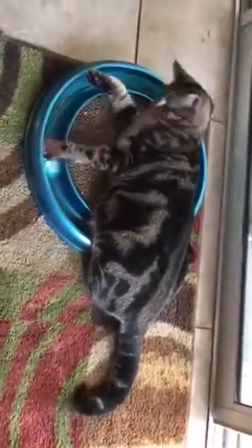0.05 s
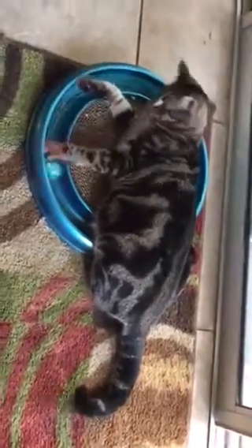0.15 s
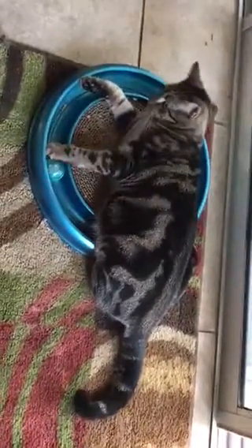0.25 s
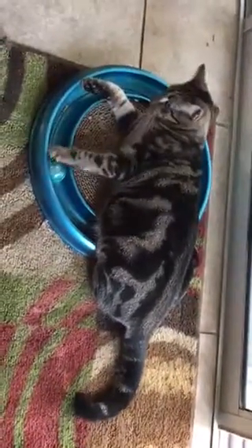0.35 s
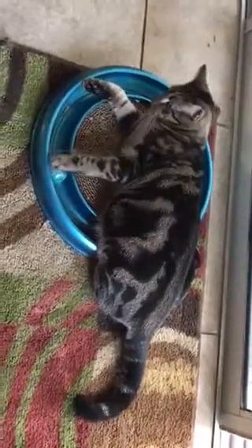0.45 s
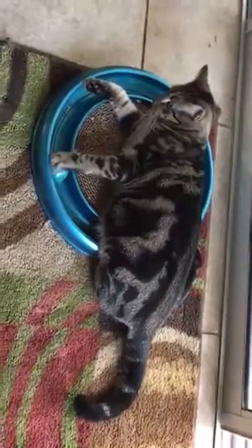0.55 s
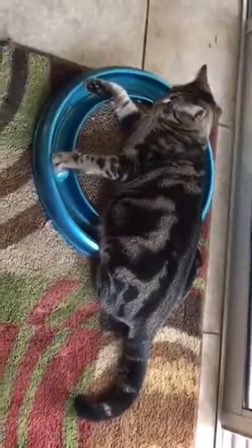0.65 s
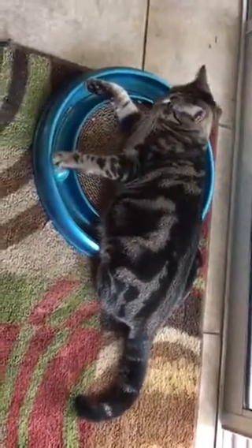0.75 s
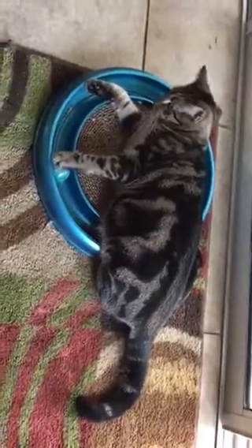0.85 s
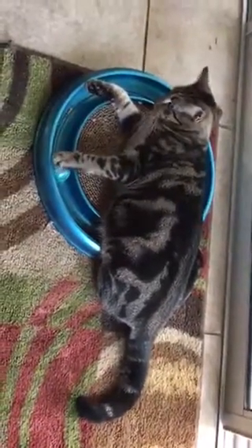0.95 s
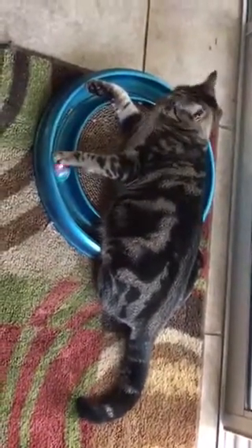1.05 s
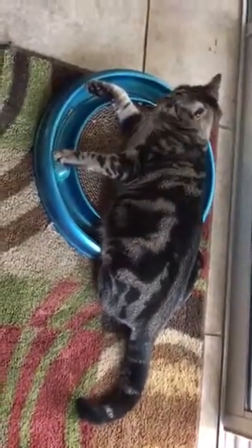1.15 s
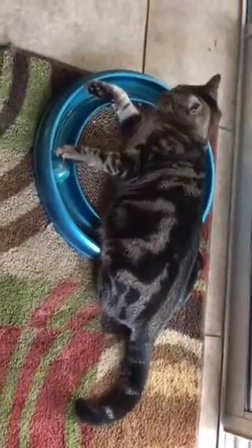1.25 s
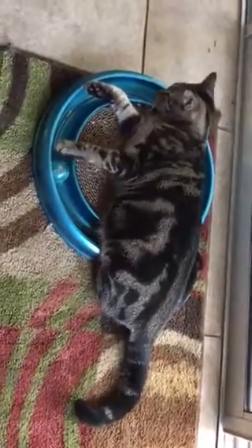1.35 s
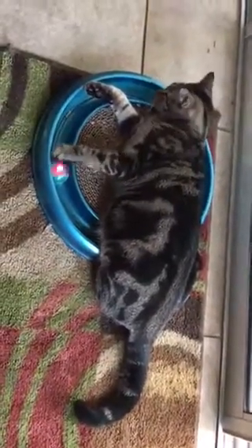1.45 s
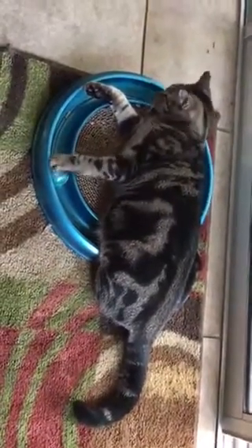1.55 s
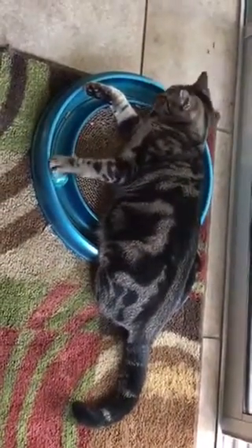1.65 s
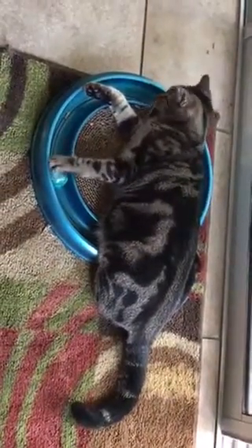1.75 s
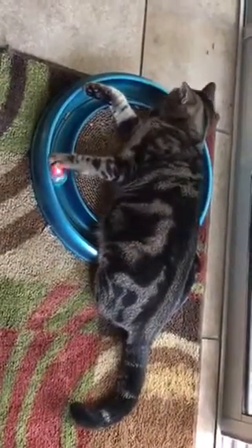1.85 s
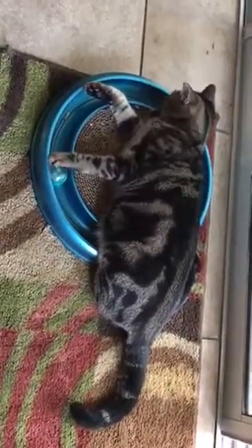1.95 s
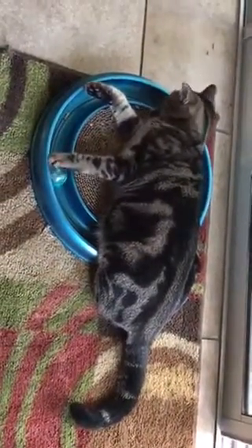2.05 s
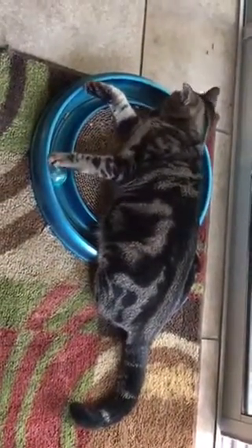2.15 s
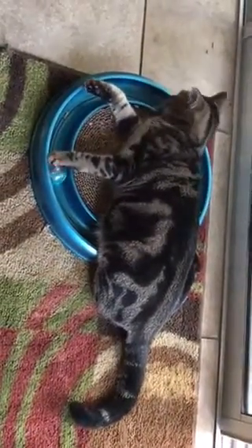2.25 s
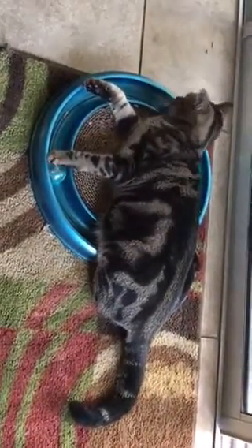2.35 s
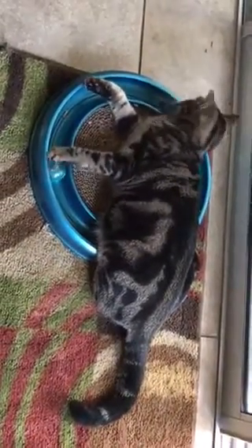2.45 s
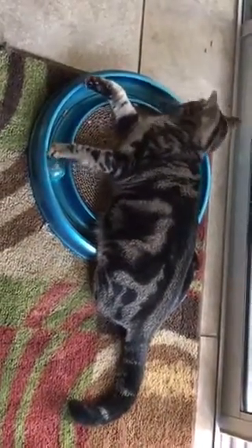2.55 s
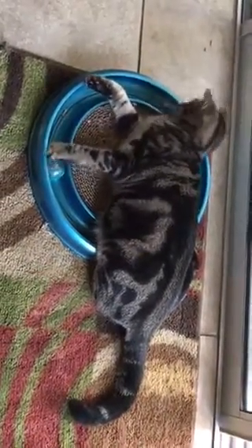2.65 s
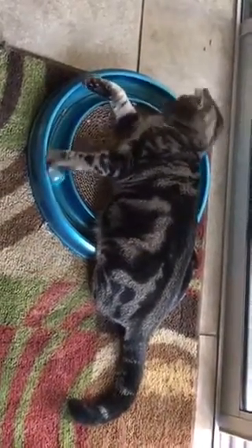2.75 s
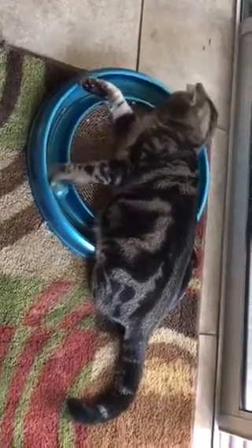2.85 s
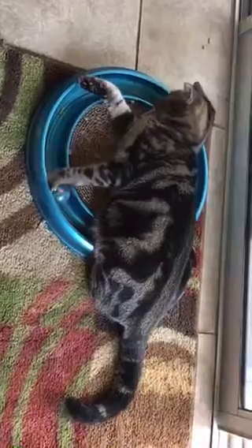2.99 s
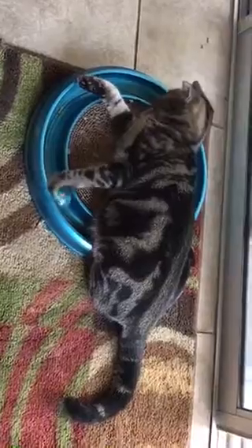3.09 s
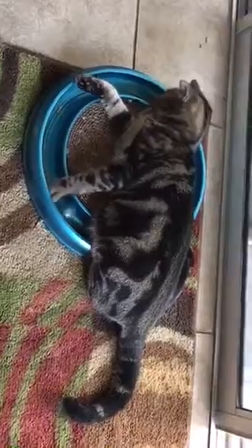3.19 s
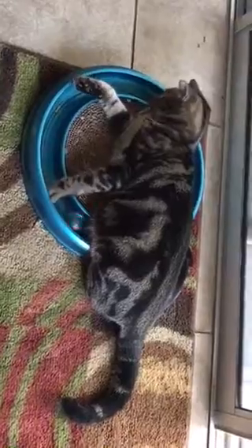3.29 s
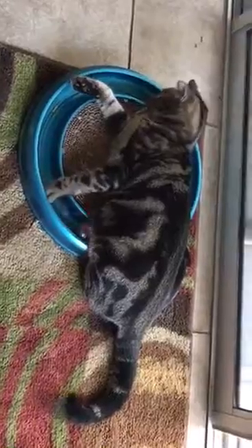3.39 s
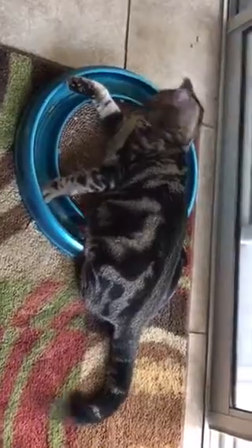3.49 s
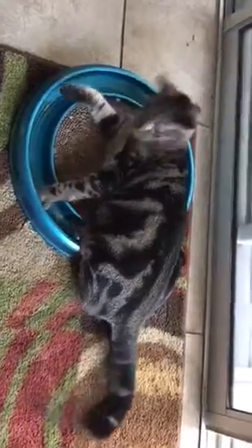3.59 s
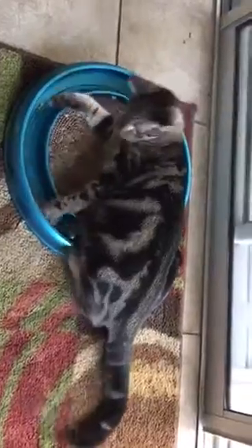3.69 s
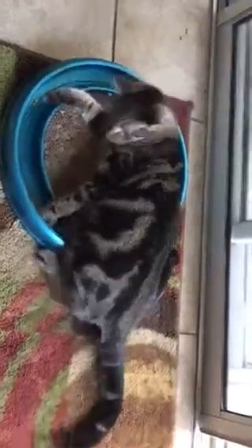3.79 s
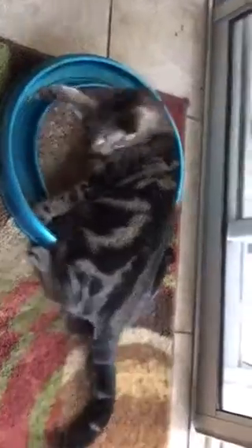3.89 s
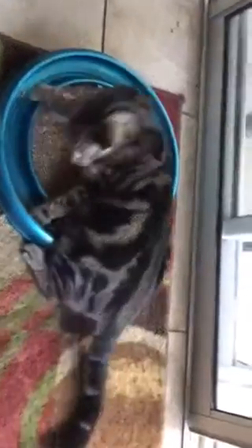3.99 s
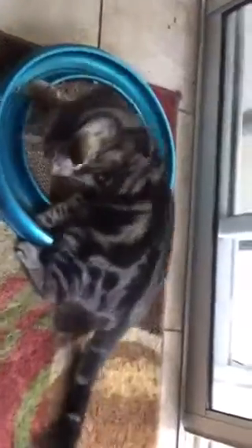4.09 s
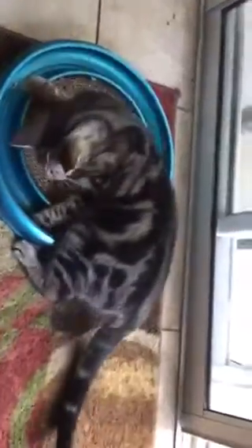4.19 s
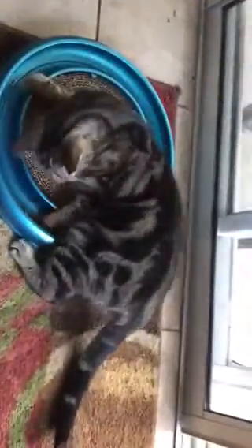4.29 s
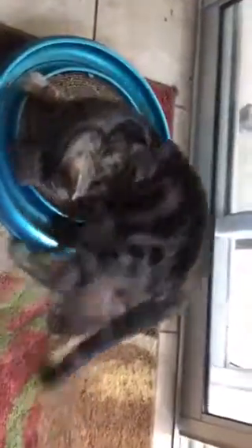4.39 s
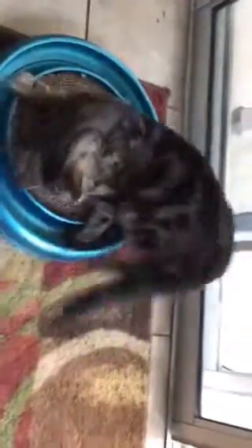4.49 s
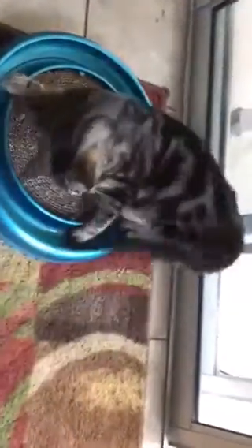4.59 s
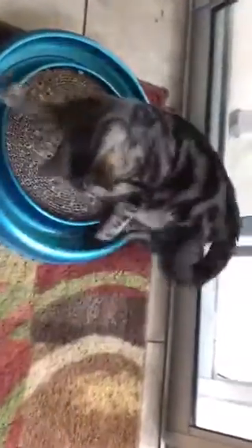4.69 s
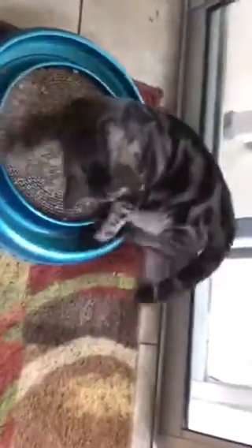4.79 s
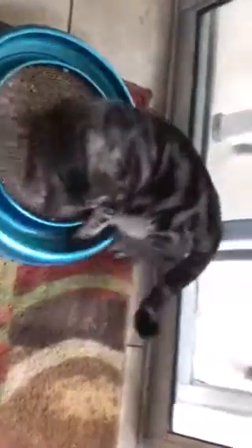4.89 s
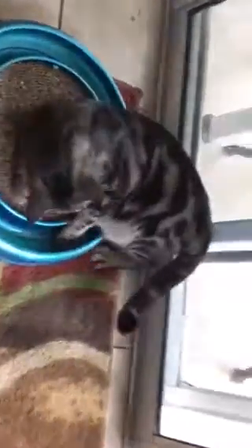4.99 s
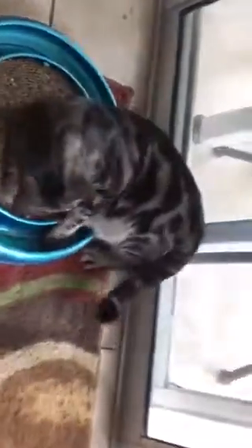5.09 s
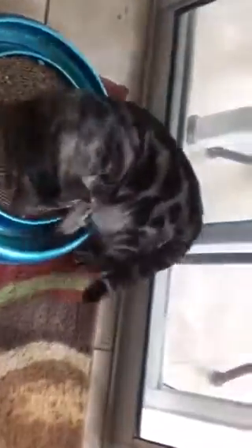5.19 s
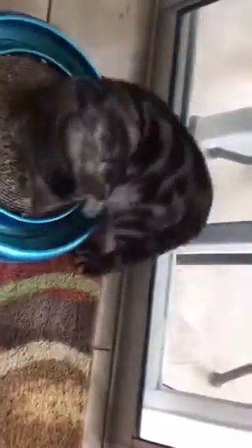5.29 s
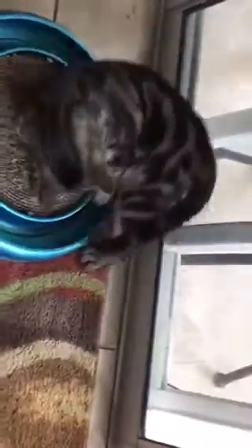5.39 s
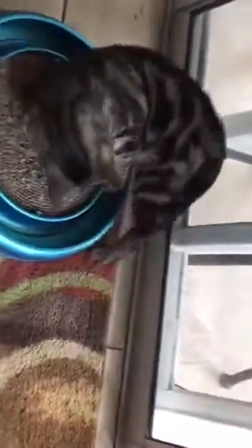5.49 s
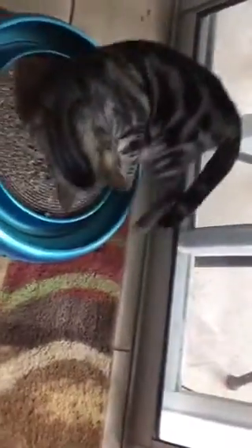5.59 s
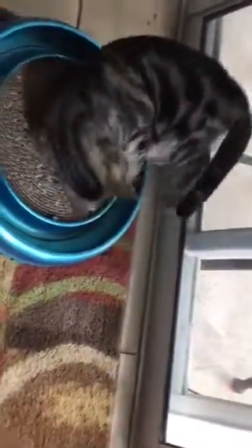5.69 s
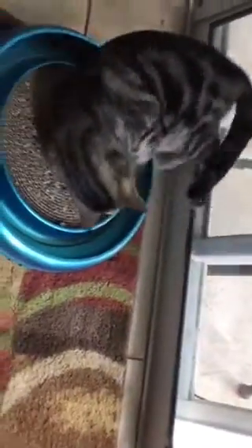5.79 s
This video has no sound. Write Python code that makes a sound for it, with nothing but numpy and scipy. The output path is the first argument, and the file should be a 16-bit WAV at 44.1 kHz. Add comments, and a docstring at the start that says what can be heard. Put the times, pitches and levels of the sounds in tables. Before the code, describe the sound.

At the start, close to the microphone, a kitten gives a plastic ball track a few hollow bumps with a brief rustle. Across a tiled room, cutlery clinks irregularly throughout, with a short echo. Things knock and slide on a far counter around 1 second, and crockery sounds faintly until about 2.4 seconds. From 2.6 seconds the kitten paws the toy again, making close plastic knocks and soft rubbing. At about 3.6 seconds something like a drawer, away from the microphone, squeaks in two quick strokes, sinking slightly in pitch; this is the loudest sound. From 4 seconds the kitten rolls and scrabbles, thumping the track while its claws snap on cardboard and plastic, sharpest near 4.9 seconds. Bumps and rustles continue until almost 6 seconds, with a few more distant knocks. Quiet room air and a faint electrical hum lie underneath.

```python
"""Cutlery clinks across a tiled room while, close to the phone's microphone, a kitten paws a ball in a
plastic track toy. Far off, steel rings, things knock and slide on a counter and crockery sounds faintly.
Up close the kitten rolls over and scrabbles, its claws snapping on the cardboard pad and the plastic.
Past halfway something like a drawer, away from the microphone, squeaks loudly in two stick-slip strokes.
Room air and a faint mains hum lie under it all."""
import sys
import numpy as np
from scipy import signal
from scipy.fft import rfft, irfft, next_fast_len
from scipy.io import wavfile
from scipy.ndimage import map_coordinates

SR = 44100
rng = np.random.default_rng(int(sys.argv[2]) if len(sys.argv) > 2 else 0)


def put_to_file(sound):
    """Save the sound as 16-bit audio at rate SR, in the file named by the first command-line argument."""
    columns = np.atleast_2d(sound).T  # one column per channel
    safe = np.clip(columns, -1, 1)
    whole_steps = np.round(safe * 32767)
    wavfile.write(sys.argv[1], SR, whole_steps.astype(np.int16))


N = 257544
TOP_HZ = 15950  # the phone's band limit

# Room tone: the air's spectrum and the mains hum's partials. Each row: frequency in Hz, level in dB.
AIR_TONE = [(20, -22), (35, -5.5), (55, 5), (110, -0.5), (165, -4.5), (370, -8.5), (500, -18), (960, -18.5),
            (2500, -25), (6000, -30.5), (10000, -34), (15900, -39)]
HUM_PARTIALS = [(59, -69.5), (120, -71.5)]

FORK, TEASPOON, KNIFE, SPOON = range(4)
# Steel modes, one list for each piece above. Each row: frequency in Hz, level in dB, t60 in seconds.
STEEL_MODES = [
    [(3940, 0.5, 0.056), (5380, -8, 0.15), (7050, 5, 0.066), (9100, -8, 0.092), (11500, -14, .18),
     (13400, -27, 0.13)],
    [(4940, -2, .12), (6850, 20, 0.06), (8100, 3, 0.045), (9000, 13, 0.093), (11400, 20, 0.056),
     (13900, 17, 0.078)],
    [(2630, -18, 0.28), (5640, -13, 0.67), (8280, 0.5, 0.29), (10800, -24, 0.1347), (12000, -11, 0.085),
     (15500, -9, 0.066)],
    [(5150, -19, 0.16), (6000, -5, 0.41), (8450, -9, 0.46), (9300, -12.5, 0.65), (12130, -1, 0.1),
     (13300, -15, 0.16)],
]
# Cutlery across the room. Each row: start in seconds, piece, level in dB, clatter against ring in dB.
CUTLERY_CLINKS = [(0.0024, FORK, -46, -7), (0.1265, FORK, -46.5, 3.5), (0.2507, FORK, -46, 1),
                  (0.595, TEASPOON, -55.5, 6), (0.658, FORK, -50.5, 8.5), (1.1437, FORK, -42.5, -11),
                  (1.2144, FORK, -53, 0), (1.279, FORK, -52, 1), (1.799, TEASPOON, -40.5, 0),
                  (1.8237, TEASPOON, -54, -2), (2.217, KNIFE, -52.5, 1), (2.394, FORK, -44.5, -3),
                  (2.404, FORK, -46.5, -10), (2.8889, KNIFE, -49.5, 5), (3.474, KNIFE, -43, 3.5),
                  (3.784, TEASPOON, -40, 8), (3.8484, TEASPOON, -41, 4.5), (4.175, TEASPOON, -49, 8),
                  (4.5843, TEASPOON, -41, 2), (4.6574, SPOON, -45.5, 3.5), (5.043, SPOON, -38.5, -2.5),
                  (5.1072, SPOON, -50, 6), (5.1901, SPOON, -45, -12), (5.3213, TEASPOON, -45, 0),
                  (5.38, SPOON, -51, 11.5)]
# Spectrum of that clatter. Each row: frequency in Hz, level in dB.
CLATTER_SPECTRUM = [(900, -12), (2500, 1.5), (6000, -0.5), (9000, 2.5), (13000, -5), (16000, -8)]

# Paws and ball hit the track, close up. Each row: start in seconds, level in dB, clack trim in dB,
# seconds to the first rebound (0 for a dead blow).
TRACK_BUMPS = [(0.018, -45.5, -1, 0.00037), (0.091, -39.5, -1, 0.033), (0.194, -50, -10, 0.0083),
               (2.572, -47.5, -13, 0.0017), (2.826, -35.5, -5, 0), (3.09, -50.5, -22, 0.0016),
               (3.208, -37, -4, 0), (3.256, -37, 0.5, .016), (3.519, -36.5, -2, 0.0015),
               (3.986, -48, -13, 0.0013), (4.103, -31.5, -8.5, 0.015), (4.475, -41.5, -3, 0.00074),
               (4.525, -29.5, -8.5, .02), (4.798, -44.5, 4, 0.0032), (4.864, -40, -11, 0.0032),
               (5.285, -34.5, 1, 0.038), (5.515, -36.5, -10, 0), (5.777, -47.5, 4.5, 0.012)]
# Resonances of the plastic track. Each row: frequency in Hz, width in Hz, level in dB.
TRACK_MODES = [(254, 57, -12), (307.5, 17.7, 5), (398.5, 22, 0), (528, 190, -11.5), (590, 123, 5),
               (920, 110, -1.5), (1130, 1200, -52)]
# Spectrum of a blow's hard edge. Each row: frequency in Hz, level in dB.
CLACK_SPECTRUM = [(500, -7.0), (1200, 1.5), (2200, -4.5), (4000, -28), (12000, -25)]

# The kitten's body sweeps and the ball rolls. Each row: middle in seconds, length in seconds,
# rub on the track in dB, rustle of fur and cardboard in dB.
BODY_SWEEPS = [(0.093, 0.25, -57.5, -58.5), (0.3, 0.37, -87, -56.5), (2.66, 0.42, -67.5, -114),
               (2.87, 0.28, -66, -62), (3.34, 0.26, -61.5, -96), (4.14, 0.28, -63.5, -61.5),
               (4.466, 0.23, -49, -56.5), (4.74, 0.35, -64.5, -58.5), (5.345, 0.17, -53.5, -56),
               (5.54, 0.38, -67.5, -67), (5.81, 0.27, -64, -59)]
# Spectra of the rub and the rustle. Each row: frequency in Hz, level in dB.
RUB_SPECTRUM = [(90, -60), (160, -4), (250, 10), (400, -2.5), (650, -2.5), (1000, -8), (2500, -19.5),
                (6000, -97)]
RUSTLE_SPECTRUM = [(700, -24), (1400, 2.5), (3500, 2.5), (6000, 1.5), (9300, -2.5), (13600, -6),
                   (15800, -7.5)]

# Things set down on the far counter. Each row: start in seconds, level in dB, resonance in Hz.
COUNTER_KNOCKS = [(0.0715, -43, 1240), (0.5695, -50.5, 1720), (0.8191, -48.5, 1520), (0.866, -40, 3640),
                  (0.892, -33, 4340), (0.968, -34, 3300), (2.0248, -36.5, 2130), (4.015, -39.5, 3980),
                  (4.1749, -32.5, 4320), (5.192, -32.5, 5350)]
# Things slid over it. Each row: time of full speed in seconds, hold in seconds, level in dB.
COUNTER_SLIDES = [(0.944, 0.093, -54), (1.638, 0.042, -53)]
# Spectrum of the sliding. Each row: frequency in Hz, level in dB.
SLIDE_SPECTRUM = [(350, -43), (600, -4), (856, -6.5), (1130, -1), (1840, -0.5), (3860, 1.5), (4940, -1.5),
                  (8420, -3.5), (15800, -23)]

# Distant crockery, touched softly. Each row: start in seconds, level in dB, pitch in Hz.
DISH_TOUCHES = [(1.215, -57.5, 2377), (1.28, -57.5, 955), (1.77, -58.5, 1140), (1.94, -58, 1480),
                (2.23, -57.5, 655), (2.39, -64, 1465)]
# Modes of a dish. Each row: multiple of the pitch, level in dB.
DISH_PARTIALS = [(1.001, 5.5), (2.6, -8), (4, -4)]

# Claws catch on cardboard and plastic, close up. Each row: start in seconds, level in dB.
CLAW_CATCHES = [(3.279, -47), (4.0897, -42), (4.398, -34.5), (4.5432, -37.5), (4.586, -36.5), (4.6747, -33),
                (4.768, -33.5), (4.799, -36), (4.8638, -23), (4.9465, -37), (5.579, -40.5)]
# Spectra of a claw's snap and of a hard tap on the toy. Each row: frequency in Hz, level in dB.
SNAP_SPECTRUM = [(300, -23), (1500, 0), (3500, 4), (6000, 6), (10000, 0.5), (16000, -3)]
TAP_SPECTRUM = [(400, -15), (1300, 2), (2200, -2), (3800, -15.5), (8000, -25.5)]

# The drawer's pitch rises briefly, then sinks. Each row: time in seconds, slips a second.
SLIP_RATE = [(3.58, 325), (3.607, 351), (3.627, 360), (3.648, 348), (3.685, 305), (3.74, 282), (3.765, 266),
             (3.785, 256), (3.83, 238)]
# Its harmonics when pulled and when easing off. Each row: multiple of the slip rate, level in dB.
PULL_ORDERS = [(1, -18.5), (2, -22), (3, -10.5), (4, -9), (5, 3.5), (6, -9), (7, -47), (8, 4), (9, -19),
               (10, -8), (11, 5), (12, -4), (13, -12.5), (14, -40), (15, -9.5), (16, -10)]
EASE_ORDERS = [(1, -19.5), (2, -24), (3, -22.5), (4, -12), (5, 3.5), (6, -5.5), (7, -16), (8, -18.5),
               (9, -4), (10, -3.5), (11, -16), (12, -28), (13, -10)]
# Its scraping when pulled and when easing off. Each row: frequency in Hz, level in dB.
PULL_RASP = [(400, -39), (700, -19), (1100, -2.5), (1700, 2.5), (2050, -12), (2850, 4), (3400, -1),
             (4100, -6), (4650, -2.5), (5000, -63), (5500, -22), (7200, -18.5), (10500, -36), (13500, -23),
             (15800, -36)]
EASE_RASP = [(400, -21), (900, -23.5), (1400, -8.5), (1950, -6.5), (2500, -11.5), (3500, -7.5), (4900, -46),
             (7000, -18.5), (7700, -36), (8500, -6), (10500, -22.5), (15800, -37)]
# Two strokes with a faint glide between. Each row: time of full grip in seconds, squeal hold in seconds,
# scrape hold in seconds, squeal level in dB, scrape level in dB, harmonics, scrape spectrum.
DRAWER_STROKES = [(3.621, .02, .02, -22.5, -28.5, PULL_ORDERS, PULL_RASP),
                  (3.715, 0.033, .025, -41, -49, EASE_ORDERS, EASE_RASP),
                  (3.762, .022, .058, -25, -38, EASE_ORDERS, EASE_RASP)]

# Decay of the tiled room. Each row: frequency in Hz, t60 in seconds.
ROOM_T60 = [(200, 0.55), (1300, 0.49), (4000, 0.41), (9000, 0.29), (15000, 0.34)]


def amp(db):
    """Decibels to gain."""
    return 10 ** (np.asarray(db) / 20)


def unit(x):
    """x at rms 1."""
    return x / np.sqrt(np.mean(x ** 2) + 1e-20)


def crest(x):
    """x at peak 1."""
    return x / (np.abs(x).max() + 1e-20)


def along(points, hz):
    """(Hz, value) points read on a log axis."""
    f, v = np.transpose(points)
    return np.interp(np.log(hz + 1), np.log(f + 1), v)


def envelope(s, attack_s, hold_s, fall_db_per_s):
    """Gain per sample: an even rise that ends at time s, a hold, and a fall straight in dB."""
    t = np.arange(N) / SR - s
    return np.clip(1 + t / attack_s, 0, 1) * amp(-fall_db_per_s * np.maximum(t - hold_s, 0))


def wobble(rate):
    """A smooth random curve, rate knots a second."""
    return map_coordinates(rng.standard_normal(int(N * rate / SR) + 4), [np.arange(N) * rate / SR])


def filtered(x, response):
    """x times a complex response of frequency."""
    size = next_fast_len(len(x) + SR // 4)
    return irfft(rfft(x, size) * response(np.fft.rfftfreq(size, 1 / SR)), size)[:len(x)]


def coloured(x, spectrum):
    """x shaped by a (Hz, dB) spectrum, at rms 1."""
    return unit(filtered(x, lambda hz: amp(along(spectrum, hz))))


def resonance(f, hz, width_hz):
    """Response at f of one mode centred on hz."""
    return 1j * f * width_hz / (hz * hz - f * f + 1j * f * width_hz)


def lowpass(f, corner_hz):
    """Response at f of a gentle two-pole treble cut."""
    return 1 / (1 + 1j * f / corner_hz) ** 2


def grains(rate, spread_db):
    """Random tiny impacts of uneven size, about rate a second."""
    return (rng.random(N) < rate / SR) * rng.standard_normal(N) * amp(spread_db * rng.standard_normal(N))


def burst(t, t60):
    """White noise that dies away."""
    return rng.standard_normal(len(t)) * amp(-60 * t / t60)


def add(out, s, x):
    """Mix x into out at time s."""
    start = max(round(s * SR), 0)
    out[start:start + len(x)] += x[:len(out) - start]


def room_tone(air_db=-60.5):
    """Still air and a slightly unsteady mains hum, there from the start."""
    t = np.arange(N) / SR
    hum = sum(amp(db) * unit(np.sin(2 * np.pi * hz * t + .4 * wobble(2.98))) for hz, db in HUM_PARTIALS)
    return hum + amp(air_db) * coloured(rng.standard_normal(N), AIR_TONE)


def ring(t, hz, t60, blur_hz):
    """A dying partial whose phase is jostled by rattling contact."""
    drift = np.cumsum(rng.standard_normal(len(t))) * np.sqrt(2 * np.pi * blur_hz / SR)
    return np.sin(2 * np.pi * hz * t + drift) * amp(-60 * t / t60)


def rattle(t, t60=0.01, spread_s=.008, count=60):
    """Many tiny steel contacts in quick succession, each a short ping at its own pitch."""
    hz = rng.uniform(2500, TOP_HZ, (count, 1))
    age = np.maximum(t - rng.gamma(2, spread_s / 2, (count, 1)), 0)
    return np.sum(np.sin(2 * np.pi * hz * age) * amp(-60 * age / t60), axis=0)


def cutlery(trim_db=-2, vary_db=2, attack_s=0.00043):
    """Each contact rings one steel piece at new strengths while it chatters against its neighbours."""
    out, t = np.zeros(N), np.arange(SR // 4) / SR
    for s, piece, db, clatter_db in CUTLERY_CLINKS:
        steel = sum(amp(mode_db + vary_db * rng.normal()) * ring(t, hz, t60, blur_hz=70)
                    for hz, mode_db, t60 in STEEL_MODES[piece])
        add(out, s, amp(db) * crest(steel) * (1 - np.exp(-t / attack_s)))
        clatter = coloured(rattle(t[:SR // 8]), CLATTER_SPECTRUM)
        add(out, s, amp(db + clatter_db) * crest(clatter))
    return amp(trim_db) * out


def blows(count=3, shrink=.6, loss_db=3):
    """Each blow on the track and its rebounds, each sooner and weaker than the last."""
    for s, db, hard_db, gap_s in TRACK_BUMPS:
        for k in range(count if gap_s else 1):
            yield s, db - loss_db * k, hard_db
            s += gap_s * shrink ** k


def track_bumps(push=2.34, push_s=0.00069, clack_db=-3, spot_db=3):
    """A padded blow and a short chatter ring the track, differently at each spot; hard ones clack."""
    out, t = np.zeros(N), np.arange(SR // 5) / SR
    for s, db, hard_db in blows():
        spot_gains = amp(spot_db * rng.standard_normal(len(TRACK_MODES)))
        shell = lambda f: sum(gain * amp(mode_db) * resonance(f, hz, width_hz)
                              for gain, (hz, width_hz, mode_db) in zip(spot_gains, TRACK_MODES))
        force = burst(t, t60=.055) + push * np.exp(-t / push_s)
        thud = filtered(force, lambda f: shell(f) * lowpass(f, corner_hz=1100))
        clack = coloured(burst(t, t60=0.056), CLACK_SPECTRUM)
        add(out, s, amp(db) * (crest(thud) + amp(hard_db + clack_db) * crest(clack)))
    return out


def scrabble(uneven_db=2, scuff_s=0.18, scuff_lag_s=0.02, scuff_db=-25.5):
    """Each sweep swells and fades, scuffing the track in coarse slips and the cardboard in fine ones."""
    out, t = np.zeros(N), np.arange(N) / SR
    flicker = lambda: amp(uneven_db * wobble(35))
    lows = lambda hz: 1 / (1 + (hz / 5000) ** 4)
    rub = coloured(grains(rate=700, spread_db=1), RUB_SPECTRUM) * flicker()
    # ridges and fibres catch independently, so the colour of the rustle keeps shifting
    ridges = filtered(grains(rate=1400, spread_db=1.5), lows) * flicker()
    fibres = filtered(grains(rate=6000, spread_db=4), lambda hz: 1 - lows(hz)) * flicker()
    rustle = coloured(unit(ridges) + 2 * unit(fibres), RUSTLE_SPECTRUM)
    # a short rub, without rustle, goes with every bump
    scuffs = [(s + scuff_lag_s, scuff_s, db + scuff_db, -np.inf) for s, db, _, _ in TRACK_BUMPS]
    for middle_s, length_s, rub_db, rustle_db in BODY_SWEEPS + scuffs:
        swell = np.cos(np.pi * np.clip((t - middle_s) / length_s, -.5, .5))
        out += swell * (amp(rub_db) * rub + amp(rustle_db) * rustle)
    return out


def counter(trim_db=-3, q=1.7, land_s=0.0026):
    """Things land on the counter with dull knocks, each around its own pitch, and hiss as they slide."""
    out, t = np.zeros(N), np.arange(SR // 4) / SR
    for s, db, hz in COUNTER_KNOCKS:
        force = burst(t, t60=0.037) * (1 - np.exp(-t / land_s))
        knock = filtered(force, lambda f: resonance(f, hz, hz / q) * lowpass(f, 2 * hz))
        add(out, s, amp(db) * crest(knock))
    hiss = coloured(grains(rate=15000, spread_db=2.5), SLIDE_SPECTRUM)
    for s, hold_s, db in COUNTER_SLIDES:
        out += amp(db) * hiss * envelope(s, attack_s=0.092, hold_s=hold_s, fall_db_per_s=170)
    return amp(trim_db) * out


def dishes(t60=0.086, touch_s=0.0024, blur_hz=50):
    """Softly touched crockery swells into one short note with two overtones."""
    out, t = np.zeros(N), np.arange(SR // 2) / SR
    for s, db, hz in DISH_TOUCHES:
        note = sum(amp(mode_db) * ring(t, k * hz, t60, k * blur_hz) for k, mode_db in DISH_PARTIALS)
        add(out, s, amp(db) * note * (1 - np.exp(-t / touch_s)))
    return out


def claws(buzz_db=-15, tap_db=-44):
    """A claw lets go with a dry snap and the pad buzzes; the toy answers with much the same tap."""
    out, t = np.zeros(N), np.arange(SR // 10) / SR
    for s, db in CLAW_CATCHES:
        snap = coloured(burst(t, t60=0.0052) + amp(buzz_db) * burst(t, t60=0.064), SNAP_SPECTRUM)
        tap = coloured(burst(t, t60=0.016), TAP_SPECTRUM)
        add(out, s, amp(db) * crest(snap) + amp(tap_db) * crest(tap))
    return out


def drawer_squeak(jitter=0.0075, puff_depth=0.2, dip_db=-2):
    """Stick-slip: a slightly uneven train of slips squeals, each slip with a puff of scraping noise."""
    out, t = np.zeros(N), np.arange(N) / SR
    for s, squeal_s, scrape_s, tone_db, rasp_db, harmonics, rasp_spectrum in DRAWER_STROKES:
        slip_hz = np.interp(t, *np.transpose(SLIP_RATE)) * (1 + jitter * wobble(500))
        phase = 2 * np.pi * np.cumsum(slip_hz) / SR
        tone = sum(amp(db) * np.sin(k * phase + rng.uniform(0, 2 * np.pi)) for k, db in harmonics)
        rasp = coloured(rng.standard_normal(N) * (1 + puff_depth * np.cos(phase)), rasp_spectrum)
        squeal = envelope(s, attack_s=.011, hold_s=squeal_s, fall_db_per_s=650)
        scrape = envelope(s, attack_s=0.043, hold_s=scrape_s, fall_db_per_s=261.5)
        out += amp(tone_db) * squeal * unit(tone)
        out += amp(rasp_db + dip_db * squeal) * scrape * rasp  # clean, regular slipping scrapes less
    return out


def tiled_room(x, build_s=0.0024):
    """The room's echo builds up quickly; each frequency dies at its own speed."""
    hz, t, noise = signal.stft(rng.standard_normal(SR * 3 // 4), SR, nperseg=256)
    decay = amp(-60 * t / along(ROOM_T60, hz)[:, None])
    _, tail = signal.istft(noise * decay * (1 - np.exp(-t / build_s)), SR, nperseg=256)
    return signal.fftconvolve(x, tail / np.linalg.norm(tail))[:N]


def scene(near_wet_db=-10, far_wet_db=1, far_direct_db=-3, drawer_wet_db=-5):
    """One microphone: the kitten is close and nearly dry; the kitchen sounds are distant and echo."""
    near = track_bumps() + claws() + scrabble()
    far = cutlery() + counter() + dishes()
    drawer = drawer_squeak()
    echo = tiled_room(amp(near_wet_db) * near + amp(far_wet_db) * far + amp(drawer_wet_db) * drawer)
    return (near + amp(far_direct_db) * far + drawer + echo + room_tone())[None]


def record(dry):
    """The phone keeps nothing above its band limit."""
    return np.array([filtered(x, lambda hz: hz < TOP_HZ) for x in dry])


dry = scene()
out = record(dry)
put_to_file(out)
```